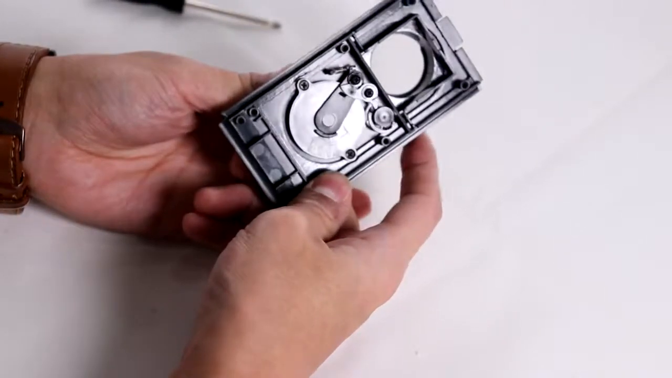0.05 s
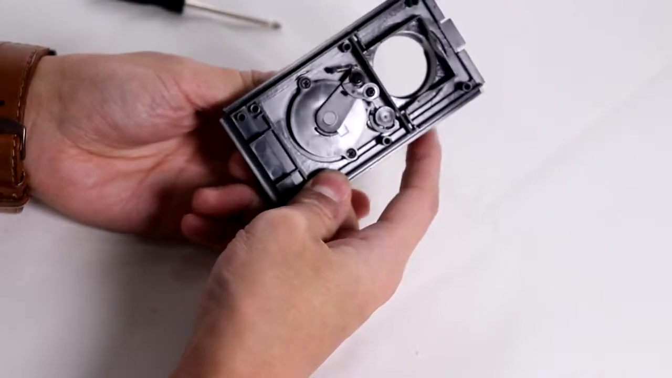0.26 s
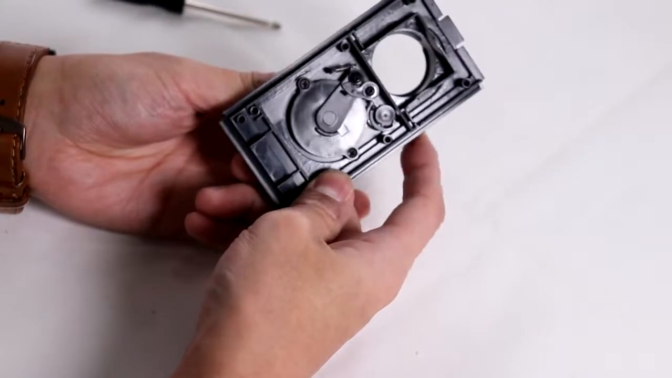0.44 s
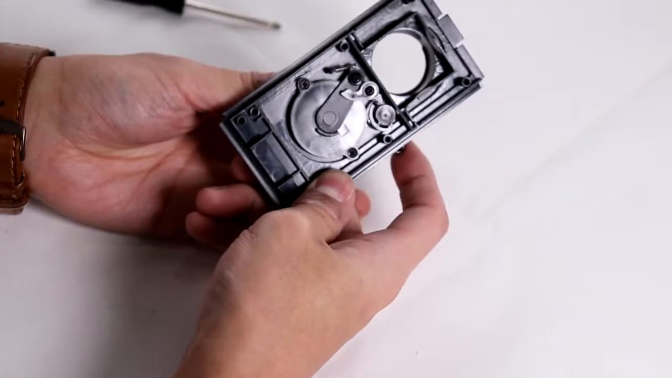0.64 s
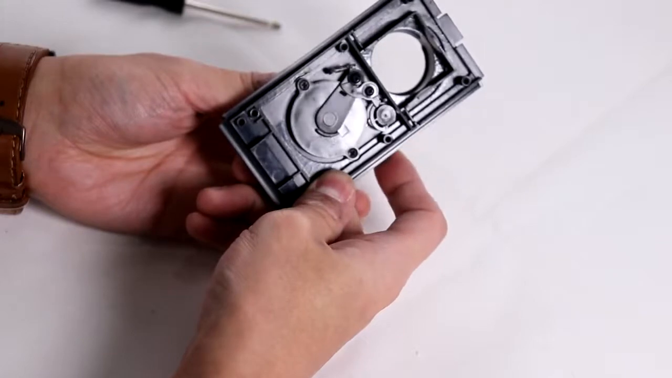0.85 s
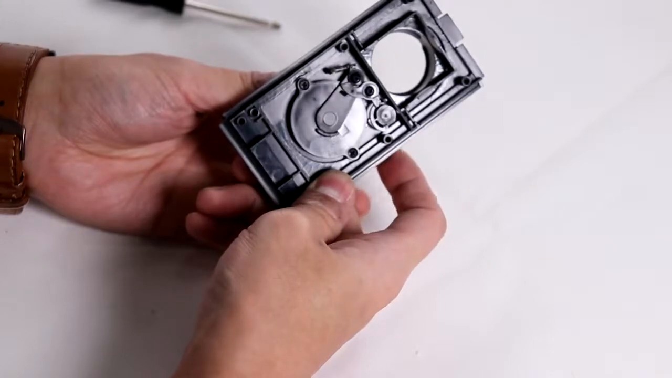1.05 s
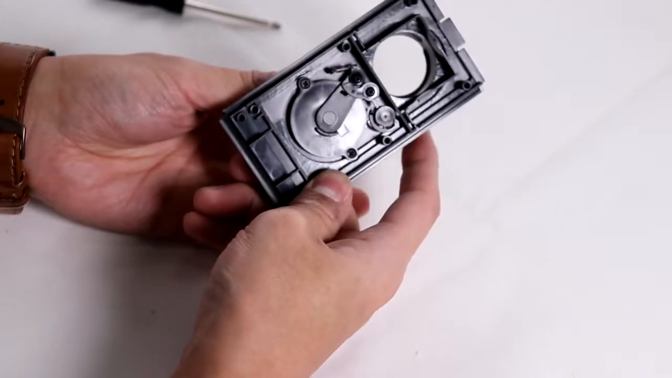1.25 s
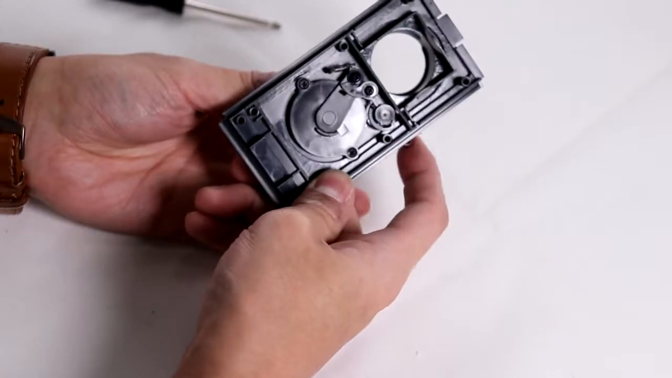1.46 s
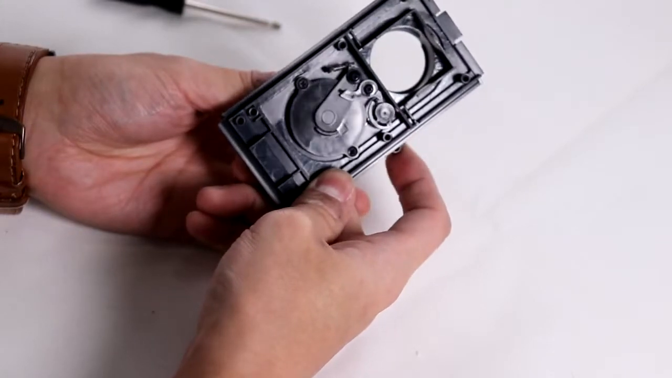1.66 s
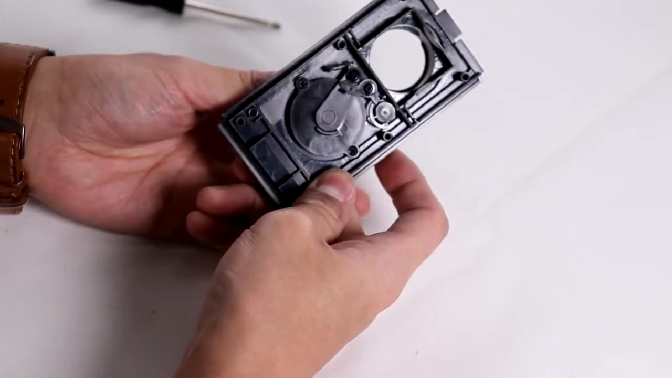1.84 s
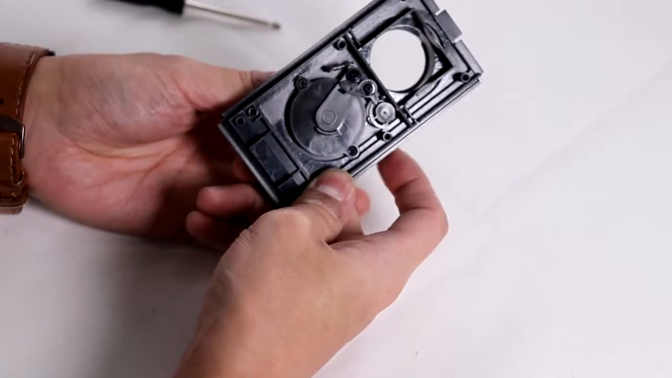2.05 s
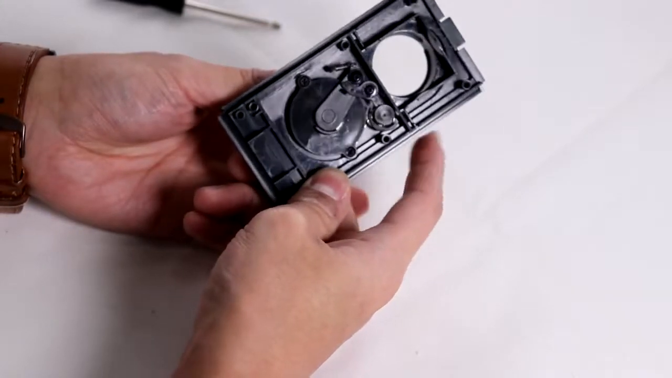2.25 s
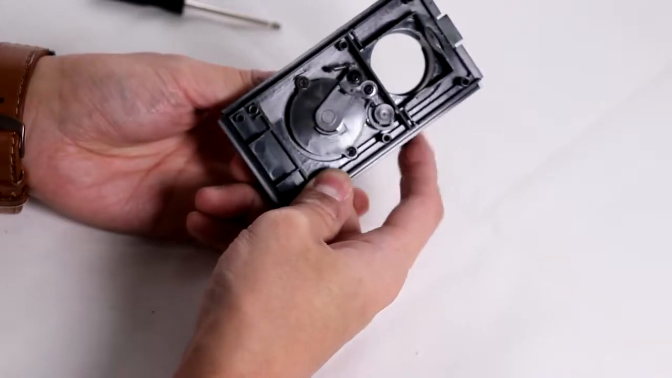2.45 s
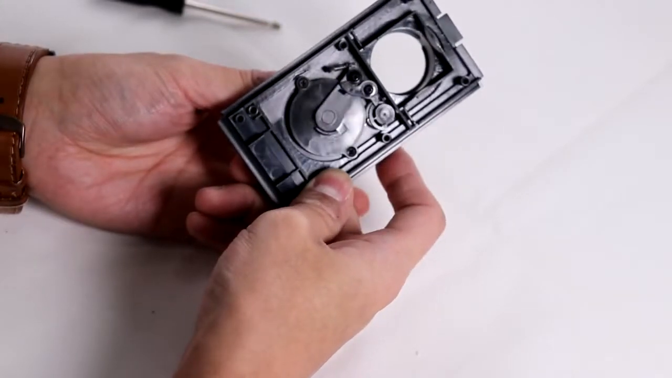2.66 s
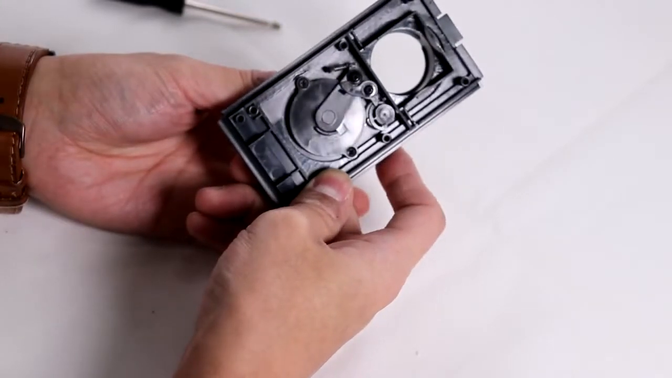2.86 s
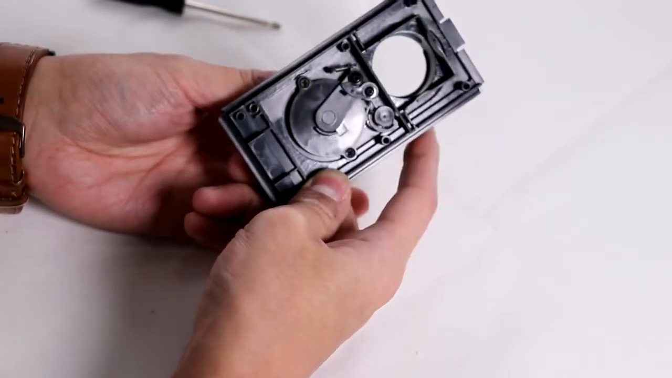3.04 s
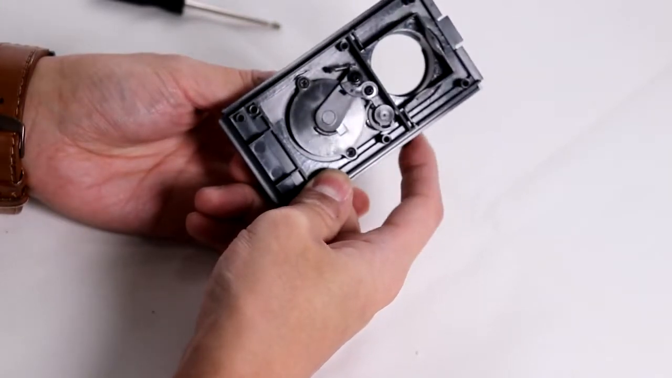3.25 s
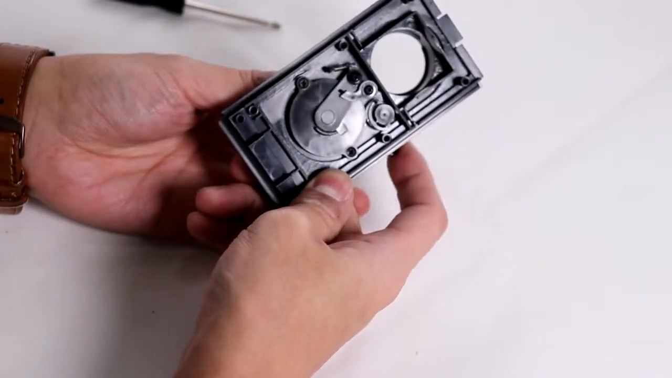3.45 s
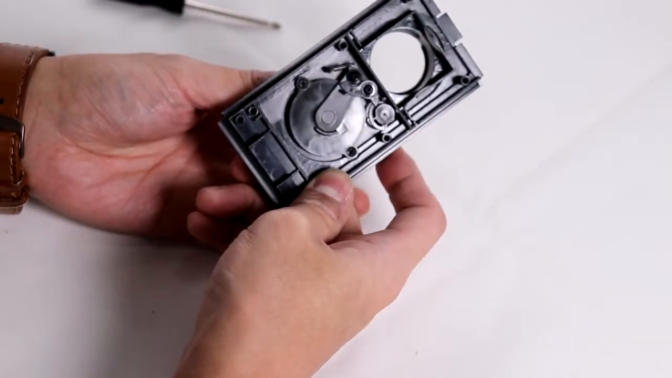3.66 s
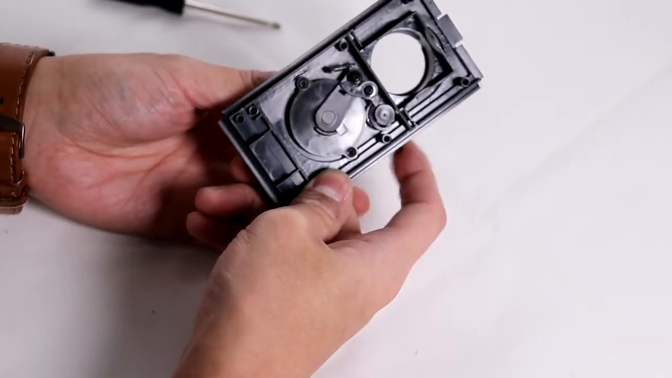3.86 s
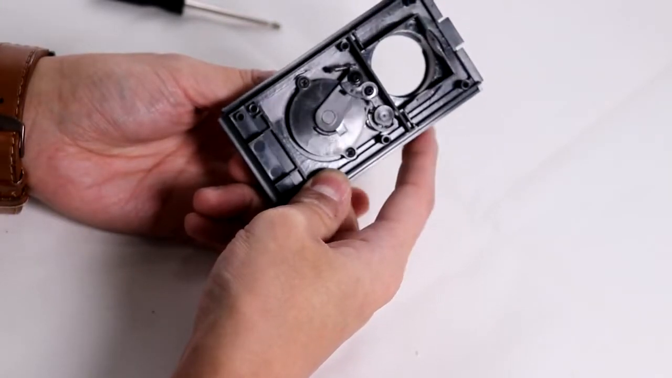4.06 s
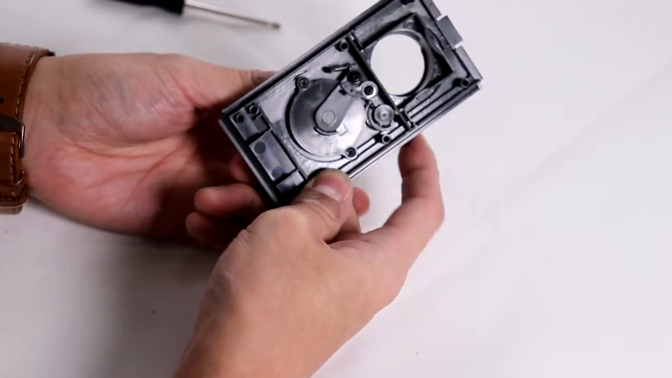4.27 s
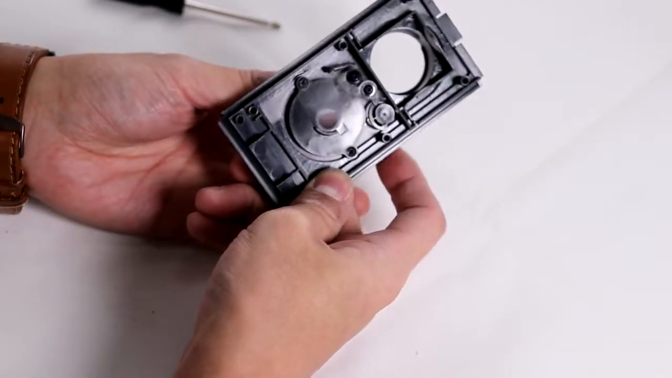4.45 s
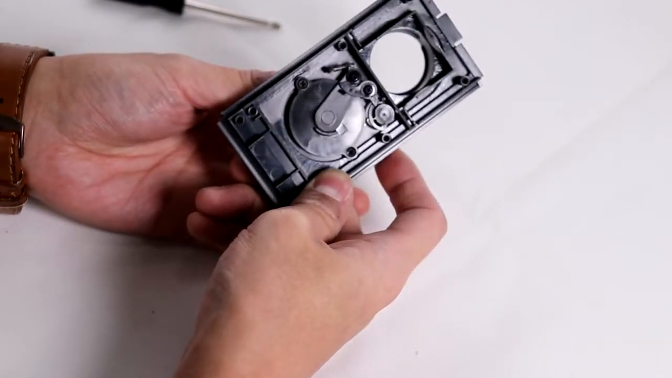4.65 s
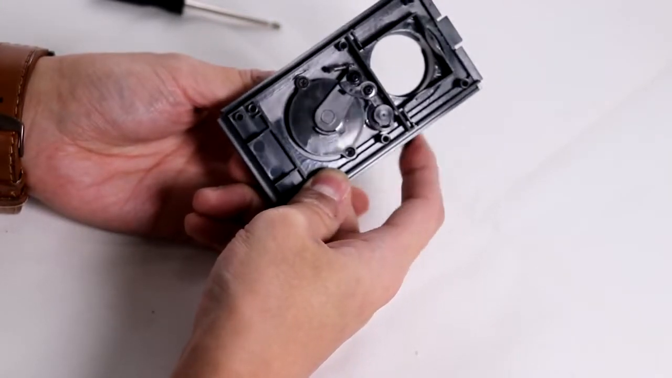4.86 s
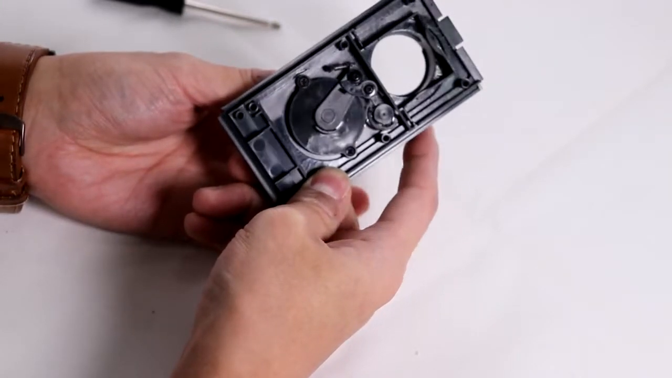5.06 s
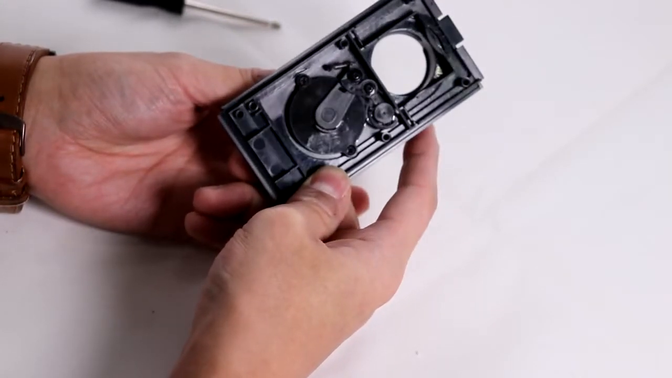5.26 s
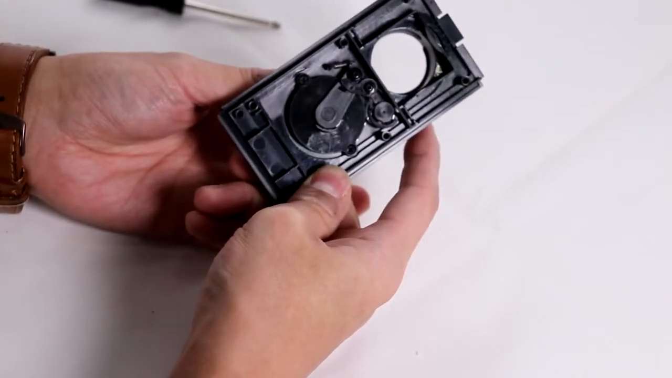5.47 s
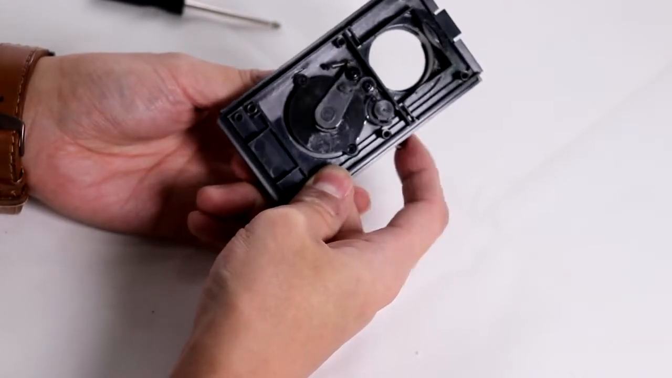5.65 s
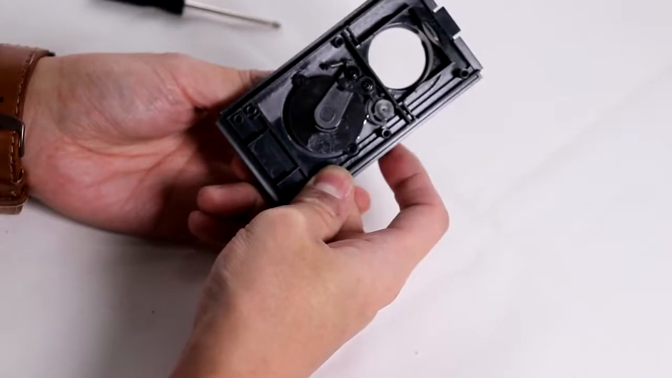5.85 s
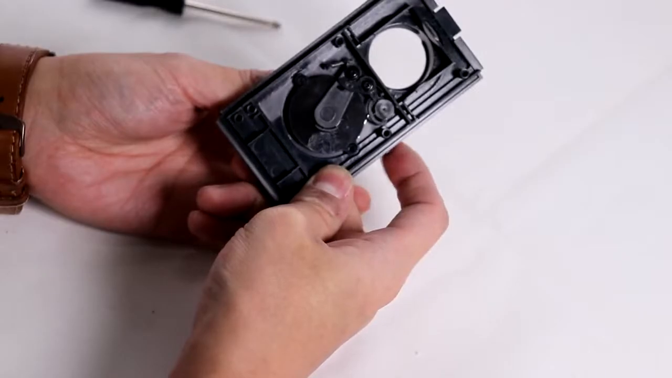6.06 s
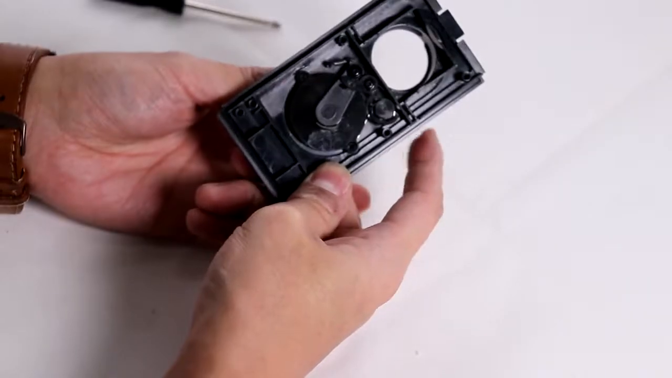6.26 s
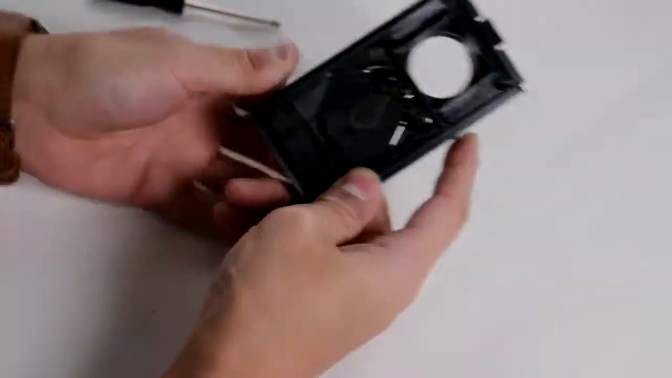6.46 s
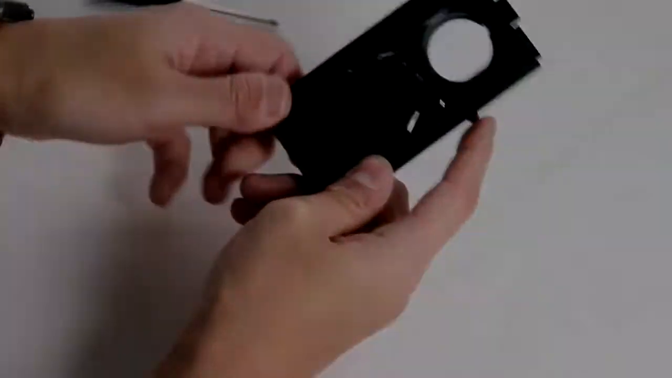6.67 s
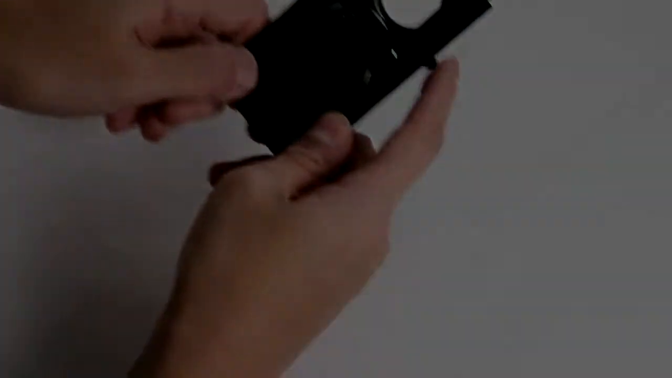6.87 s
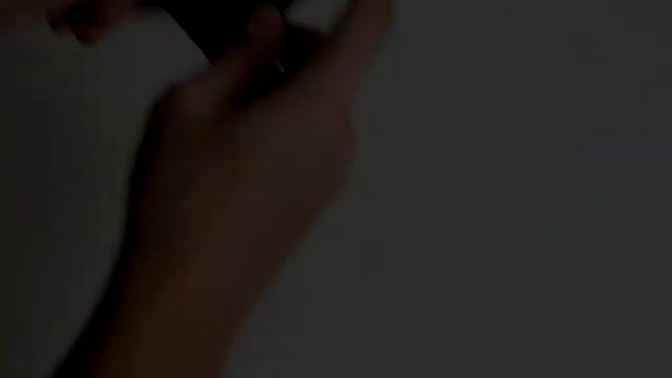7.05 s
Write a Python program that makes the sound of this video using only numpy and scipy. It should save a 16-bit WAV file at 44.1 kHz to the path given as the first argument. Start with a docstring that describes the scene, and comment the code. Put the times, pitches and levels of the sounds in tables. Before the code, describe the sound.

Over a steady, quiet ventilation hum indoors, a plastic shutter mechanism is pressed and released again and again, very near the microphone. Each of the six presses gives a bright, hard snap of catch and blade, answered about half a second later by a faint creak and a softer reset click. The clicks ring briefly in the room. It ends with a soft slide of fingers on plastic and one small tick.

```python
"""In a hard-walled room, over a ventilation hum, a small plastic shutter is worked by finger close to a
stereo microphone. Pressing trips the catch; the blade flies off, hits its stop and rebounds. Letting go,
the lever creaks back by stick-slip friction and resets. Every impact excites the same damped modes of
the frame, and the room reverberates. An automatic gain control ducks after the loud blows, whose
peaks clip."""
import sys
import numpy as np
from scipy import signal
from scipy.fft import rfft, irfft
from scipy.io import wavfile

SR = 44100
rng = np.random.default_rng(int(sys.argv[2]) if len(sys.argv) > 2 else 0)


def to_wav(sig):
    """Store sig (one row per channel, or 1-D mono) as 16-bit WAV at the path in sys.argv[1].

    Samples outside -1..1 are clipped; the rate is SR.
    """
    pcm = np.clip(np.atleast_2d(sig), -1, 1) * 32767
    pcm = np.round(pcm).astype(np.int16)
    wavfile.write(sys.argv[1], SR, pcm.T)  # frames by channels


N = 313551
LEAD = 6600   # samples played before time zero, so that a tail is already ringing


def from_db(db):
    """Amplitude ratio of a level in decibels."""
    return 10 ** (np.asarray(db) / 20)


def unit_rms(x):
    """Normalisation to a root-mean-square value of 1."""
    return x / np.sqrt(np.mean(x ** 2) + 1e-20)


def at_hz(points, hz):
    """Interpolation of a table on a logarithmic frequency axis."""
    frequencies, values = np.transpose(points)
    return np.interp(np.log(hz), np.log(frequencies), values)


def smooth(x, seconds):
    """Exponential averaging: a one-pole low-pass with the given time constant."""
    r = np.exp(-1 / (seconds * SR))
    return signal.lfilter([1 - r], [1, -r], x)


def resonator(x, hz, t60):
    """Damped oscillator: a unit impulse rings at a height of about 1 and falls 60 dB in t60 seconds."""
    r, w = from_db(-60 / (t60 * SR)), 2 * np.pi * hz / SR
    return signal.lfilter([.5, 0, -.5], [1, -2 * r * np.cos(w), r * r], x + 1e-18)


# Stereo width of the noises: (frequency [Hz], side relative to mid [dB])
NOISE_WIDTH = [(60, -31.5), (110, -30.5), (200, -18), (380, -10), (700, -5), (1290, -3), (2380, -1),
               (4400, -1), (8120, 0.5), (15000, -3)]

def stereo_noise(gain_at):
    """Partial coherence: shaped noise whose two channels grow unlike towards the treble."""
    hz = np.maximum(np.fft.rfftfreq(N, 1 / SR), 1)
    mid, side = rfft(rng.standard_normal((2, N))) * gain_at(hz)
    return unit_rms(irfft(mid + from_db(at_hz(NOISE_WIDTH, hz)) * side * [[1], [-1]], N))


# Rush and hiss of the ventilation: (frequency [Hz], relative spectral density [dB])
AIR_SPECTRUM = [(15, -72.5), (25, -48), (49, -9), (87, -7), (120, -5.5), (149, -10), (236, -9),
                (270, -13.5), (463, -20.5), (531, -26), (591, -26.5), (2160, -36), (2610, -36), (4030, -40),
                (16000, -50.5)]
# Resonances of duct and motor: (frequency [Hz], bandwidth [Hz], level [dB])
HUM_BANDS = [(28, 14, -69), (64.1, 9.9, -44.5), (119.93, 7, -43.5), (169.2, 12, -53.5), (236.1, 9, -54),
             (461.7, 50, -58.5)]

def ventilation(rush_db=-43):
    """Noise-driven resonance: narrow wavering bands of duct and motor stand on a broadband rush."""
    out = from_db(rush_db) * stereo_noise(lambda hz: from_db(at_hz(AIR_SPECTRUM, hz)))
    for centre_hz, width_hz, db in HUM_BANDS:
        out += from_db(db) * stereo_noise(lambda hz: 1 / (1 + (2 * (hz - centre_hz) / width_hz) ** 2))
    return out


# Decay of the diffuse field: (frequency [Hz], reverberation time [s])
REVERB_TIMES = [(800, 0.47), (2100, 0.54), (5600, 0.37), (10000, 0.35), (15000, 0.28)]
# Strength of the diffuse field: (frequency [Hz], energy relative to the direct sound [dB])
REVERB_LEVELS = [(750, -7), (1100, -1.5), (1500, -10), (2100, -10.5), (5600, -7), (10000, -12),
                 (15000, -8.5)]

def room(x, early_db=-3, early_t60_s=.038):
    """Reverberation: early reflections from hands and table, then a tail that decays band by band."""
    t = np.arange(24000) / SR
    # one impulse response from each side of the source to each channel
    response = rng.standard_normal((2, 2, len(t))) * from_db(-60 * t / early_t60_s) * (t > .001)
    response *= from_db(early_db) / np.sqrt(np.sum(response ** 2) / 2)
    build_up = 1 - np.exp(-t / .0016)   # the walls answer late
    edges_hz = 500 * 2 ** np.arange(0, 5.1, .5)   # half octaves
    for low, high in zip(edges_hz, edges_hz[1:]):
        hz = np.sqrt(low * high)
        band_pass = signal.butter(2, [low, high], "band", fs=SR, output="sos")
        band = signal.sosfilt(band_pass, rng.standard_normal(response.shape))
        fade = from_db(-60 * t / at_hz(REVERB_TIMES, hz)) * build_up
        response += from_db(at_hz(REVERB_LEVELS, hz)) * band * fade / np.sqrt(np.sum(fade ** 2))
    return signal.fftconvolve(x[:, None], response, axes=2).sum(axis=0)[:, :x.shape[1]]


# Fingers sliding over the frame as the grip changes: (time [s], level [dB])
SLIDE_LEVELS = [(6.5, -62), (6.526, -53.5), (6.608, -47), (6.668, -52.5), (6.694, -47), (6.776, -45.5),
                (6.884, -61), (6.9, -51)]
# Colour of their rustle: (frequency [Hz], relative spectral density [dB])
SLIDE_SPECTRUM = [(350, -42), (600, 0.5), (642, -1), (706, -11.5), (832, -4), (8400, -15.5), (15500, -28)]

def fingers():
    """Sliding friction: skin on plastic gives noise, made grainy by random amplitude modulation."""
    times, levels_db = np.transpose(SLIDE_LEVELS)
    envelope = from_db(np.interp(np.arange(N) / SR, times, levels_db, left=-120, right=-120))
    grain = from_db(unit_rms(smooth(rng.standard_normal(N), seconds=.0021)))
    rustle = stereo_noise(lambda hz: from_db(at_hz(SLIDE_SPECTRUM, hz)) * (hz > 500))
    return envelope * unit_rms(grain * rustle)


# Ticks of the lever under the finger: (time [s], peak level [dB], frequency [Hz])
LEVER_TICKS = [(.768, -50.5, 7000), (1.273, -39, 6730), (1.822, -41.5, 2700), (1.84, -41, 7850),
               (2.266, -39, 6800), (2.643, -42, 8100), (2.691, -46, 8500), (2.721, -38, 2980),
               (3.102, -38.5, 7300), (3.425, -45, 7000), (3.601, -42.5, 3060), (3.645, -41, 2400),
               (4.038, -42.5, 6860), (4.586, -46, 2800), (5.007, -37, 6800), (5.749, -45, 7400),
               (5.881, -42, 3010), (5.909, -28, 2760), (6.284, -38.5, 7000), (7.007, -31.5, 4400)]
# The released lever creaks back and resets: (creak time [s], reset time [s], creak peak level [dB])
LEVER_RETURNS = [(0.185, .2423, -38), (1.292, 1.3474, -37), (2.288, 2.3582, -37.5), (3.114, 3.1552, -37.5),
                 (4.062, 4.1082, -38.5), (5.029, 5.0747, -34.5), (6.309, 6.3486, -35)]

def lever(tick_s=.0035, creak_s=.02, creak_hz=2876):
    """Stick-slip friction: each burst of slips drives one broad resonance, with some grit around it."""
    out, size = np.zeros(N + LEAD), 2000
    t = np.arange(size) / SR
    ticks = [(s, db, hz, tick_s) for s, db, hz in LEVER_TICKS]
    creaks = [(s, db, creak_hz, creak_s) for s, _, db in LEVER_RETURNS]
    for s, db, hz, length_s in ticks + creaks:
        slips = rng.standard_normal(size) * np.exp(-(t / length_s) ** 2)
        grit = .24 * np.diff(slips, prepend=0)
        burst = resonator(slips, hz, t60=8 / hz) + grit
        out[LEAD + round(s * SR):][:size] += from_db(db) * burst / np.abs(burst).max()
    return out


# Presses of the shutter; only the tail of the first is heard:
# (catch time [s], blade stop time [s], vigour [dB], added gain of the blade start [dB])
PRESSES = [(-.14, -0.111, 4.5, -11), (0.9114, 0.9497, 0, -13), (1.91, 1.9462, 0.5, -9),
           (2.7628, 2.802, -0.5, -12.5), (3.6885, 3.7324, -0.5, -14), (4.6207, 4.6463, -0.5, -13.5),
           (5.9161, 5.9453, 0, -15)]
# The lever sometimes bounces after a blow: (time [s], gain [dB])
LEVER_BOUNCES = [(0.2834, -24), (1.4014, -22), (2.3838, -8.5), (4.6692, -20.5), (6.3642, -12.5)]

def impacts(flight_s=.0081, rebound_s=.0102):
    """Collision sequence of the mechanism: a list of (time [s], gain [dB]) for each kind of contact."""
    catches = [(s, db + .1) for s, _, db, _ in PRESSES]
    starts = [(s - flight_s, db + start_db) for _, s, db, start_db in PRESSES]
    stops = [(s, db + 2.5) for _, s, db, _ in PRESSES]
    rebounds = [(s + rebound_s, db + 11) for _, s, db, _ in PRESSES]
    resets = [(s, -2.5) for _, s, _ in LEVER_RETURNS]
    return catches, starts, stops, rebounds, resets, LEVER_BOUNCES


# Modes of the plastic frame and their drive by each kind of contact:
# (frequency [Hz], 60 dB decay time [s], left minus right [dB], catch [dB], blade start [dB],
#  blade stop [dB], blade rebound [dB], reset [dB], lever bounce [dB])
FRAME_MODES = [(650, 0.0031, -9, -37, -45, -29.5, -40.5, -51.5, -31.5),
               (1088, 0.018, -3, -39.5, -32, -40, -37, -51.5, -24.5),
               (1380, 0.005, 3.5, -39.5, -29.5, -37, -39.5, -33, -12.5),
               (1930, 0.0047, 2, -15.5, -22, -37, -20, -11, -7.5),
               (2335, 0.0052, -2, -2, -23.5, -16.5, -17, -9, -22.5),
               (3160, 0.006, -3.5, -14, 0, -22, -20.5, -17.5, -19.5),
               (3355, 0.0057, -1, -13, -28.5, -22.5, -21, -15.5, -15),
               (4320, 0.0063, -2, -21.5, -21.5, -33.5, -19.5, -27.5, -10.5),
               (4400, 0.0095, -4.5, -22, -18.5, -22, -20.5, -17.5, -18),
               (4860, 0.004, 12.5, -14.5, 1, -17.5, -15.5, -14.5, -14),
               (5540, 0.006, 2.5, -23, -10, -21, -9.5, -11, -12),
               (5820, 0.006, 1, -25, 7.5, 1, -10, -13.5, -18), (6170, 0.0056, 6, -9, 1, -8.5, -38, -14, -7),
               (6335, 0.0066, 5, -5.5, -15, -10, -24.5, -16.5, -7),
               (7550, 0.0036, 3.5, -10.5, 5.5, -6, -20.5, -21, -13),
               (8000, 0.0026, 9, -11, -16.5, -12, -43, -10, -23),
               (8550, 0.003, 0.5, -5.5, -12, -8.5, -17, -5.5, -15.5),
               (9460, 0.0029, 7, -18, -11, -33, -17.5, -9, -12),
               (10470, 0.0024, -12, -16.5, -20, -14, -25.5, -12, -20),
               (11440, 0.0034, 0.5, -10, -12, -30, -26, -5.5, -22),
               (11520, 0.0036, -5.5, -27, -21, -19, -23, -7.5, -24.5),
               (13500, 0.0024, 1, -40, -10, -14, -29.5, -12.5, -22),
               (15800, 0.0042, 4, -16, -19, -28.5, -36, -17, -24),
               (16340, .003, 12, -19, -18, -18, -29, -17, -36)]

def frame(force, kind, contact_pan_db):
    """Modal superposition: each channel's ringing at unit rms, and the rms its modal energies give it."""
    ringing, power = 0, 0
    for k, (hz, t60, pan_db, *drive_db) in enumerate(FRAME_MODES):
        impulse_power = t60 * SR / (4 * np.log(1000)) / force.shape[1]   # left by a unit impulse
        balance_db = (pan_db + contact_pan_db) / 2 * np.array([[1], [-1]])
        mode_rms = from_db(drive_db[kind] + balance_db) * np.sqrt(impulse_power)
        sign = (-1) ** k   # neighbouring modes swing in opposite phase and add up between their peaks
        ringing += sign * mode_rms * [unit_rms(side) for side in resonator(force, hz, t60)]
        power += mode_rms ** 2
    return [unit_rms(side) for side in ringing], np.sqrt(power)


# Kinds of contact, in the order of the frame's drive columns:
# (rattle time scale [s], left minus right [dB], weight of the first hard touch [1])
CONTACT_KINDS = [(.0014, -2.5, 5), (.0011, -2, 2.5), (.0009, 1, 3), (.0008, -.5, 3), (0.000665, -1.5, 7),
                 (0.0023, -1.5, .6)]

def shutter(variation=.7, crack_db=-9, crack_t60_s=.004, crack_hz=(2800, 11000), bass_cut_hz=300):
    """Impact excitation: a rattle of micro-contacts rings the frame; its many weak modes add a crack."""
    out, size = np.zeros((2, N + LEAD)), 1200
    t = np.arange(size) / SR
    crack_band = signal.butter(2, crack_hz, "band", fs=SR, output="sos")
    for kind, blows in enumerate(impacts()):
        rattle_s, pan_db, touch = CONTACT_KINDS[kind]
        envelope = t / rattle_s * np.exp(-2 * t / rattle_s)
        pattern = rng.standard_normal((2, size))   # the parts meet much the same way each time
        pattern[1] = .9 * pattern[0] + .44 * pattern[1]   # each side hears the frame from its own angle
        for s, db in blows:
            force = envelope * (pattern + variation * rng.standard_normal(size))
            force[:, round(rattle_s * SR / 4)] += touch   # one hard contact leads the rattle
            ringing, rms = frame(force, kind, pan_db)
            crack = signal.sosfilt(crack_band, rng.standard_normal(size)) * from_db(-60 * t / crack_t60_s)
            blow = ringing + from_db(crack_db) * unit_rms(crack)
            start = LEAD + round(s * SR)
            out[:, start:start + size] += from_db(db) * rms * blow
    # so small a body radiates no bass
    return signal.sosfilt(signal.butter(4, bass_cut_hz, "high", fs=SR, output="sos"), out)


def scene():
    """Superposition: shutter and lever with their reverberation, over finger rustle and ventilation."""
    direct = shutter() + lever()
    return (direct + room(direct))[:, LEAD:] + fingers() + ventilation()


def record(dry, threshold_db=-14.5, slope=1.59, release_db_per_s=112, cutoff_hz=15800):
    """Automatic gain control: gain falls above a threshold and recovers steadily; overload clips."""
    level_db = 10 * np.log10(smooth(np.mean(dry ** 2, axis=0), seconds=.0066) + 1e-12)
    demand_db = slope * np.maximum(level_db - threshold_db, 0)
    recovery_db = release_db_per_s * np.arange(N) / SR
    duck_db = np.maximum.accumulate(demand_db + recovery_db) - recovery_db
    gain = from_db(-smooth(duck_db, seconds=.005))   # the attack lags behind the blow
    clipped = np.clip(dry * gain, -1, 1)
    low_pass = signal.ellip(10, .5, 60, cutoff_hz, fs=SR, output="sos")
    return np.clip(signal.sosfilt(low_pass, clipped), -1, 1)


dry = scene()
out = record(dry)
to_wav(out)
```